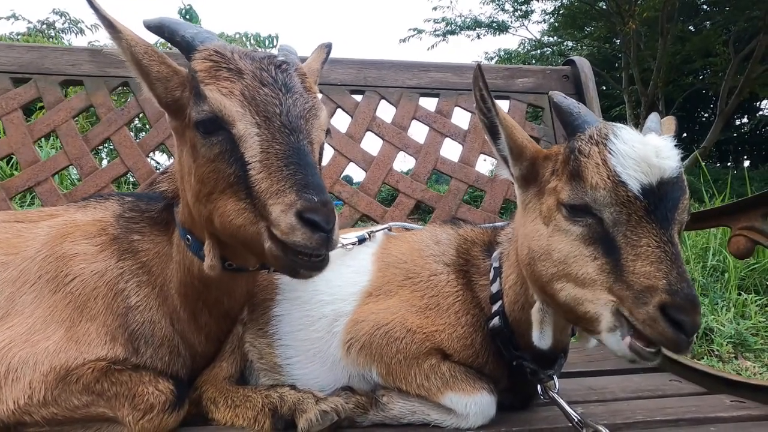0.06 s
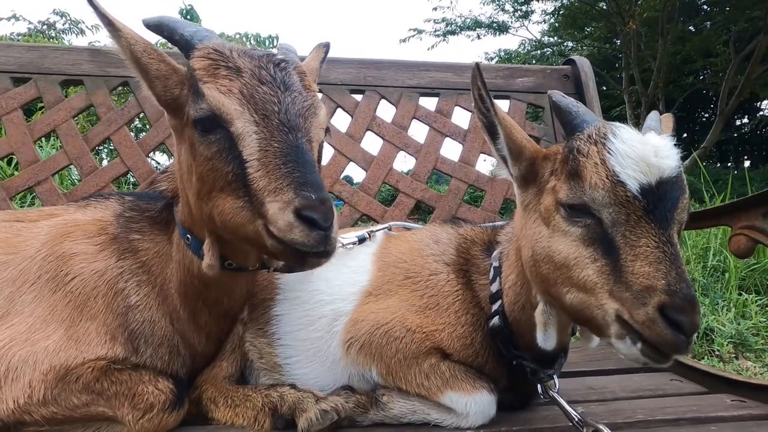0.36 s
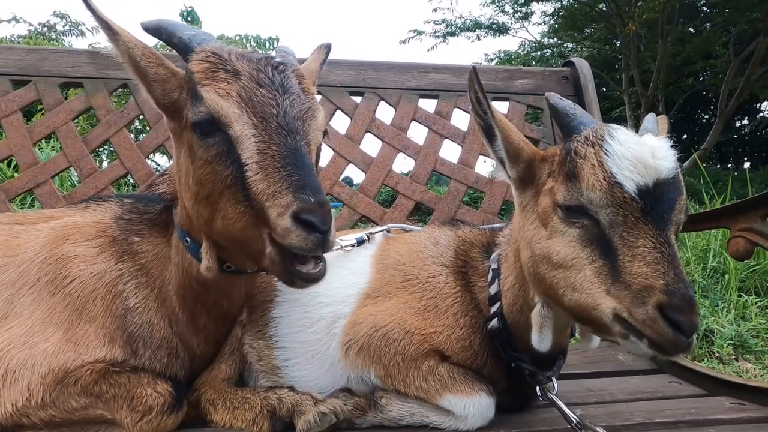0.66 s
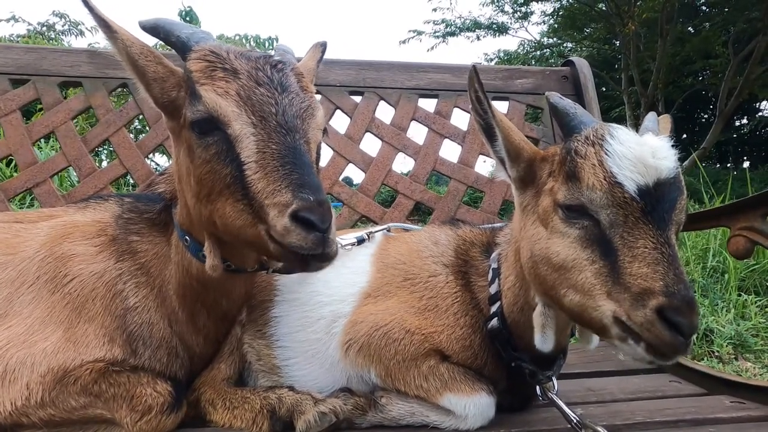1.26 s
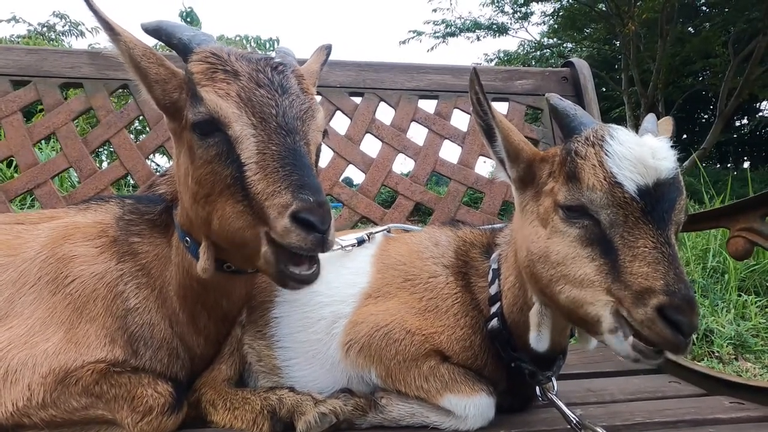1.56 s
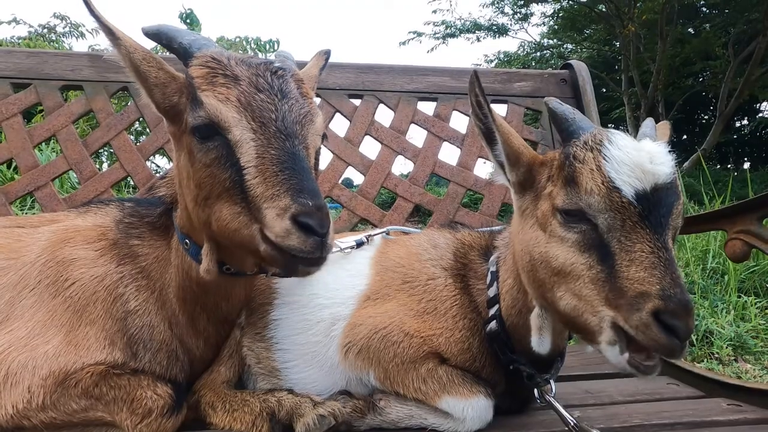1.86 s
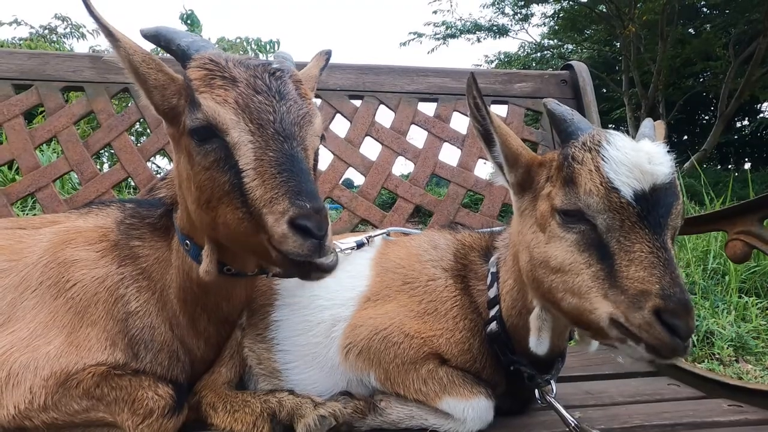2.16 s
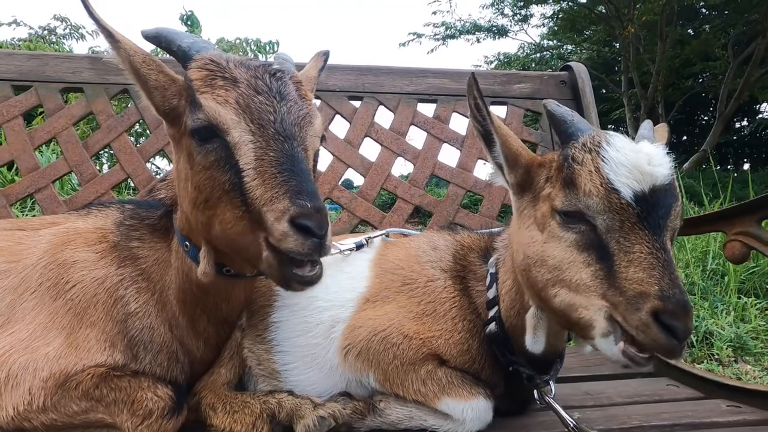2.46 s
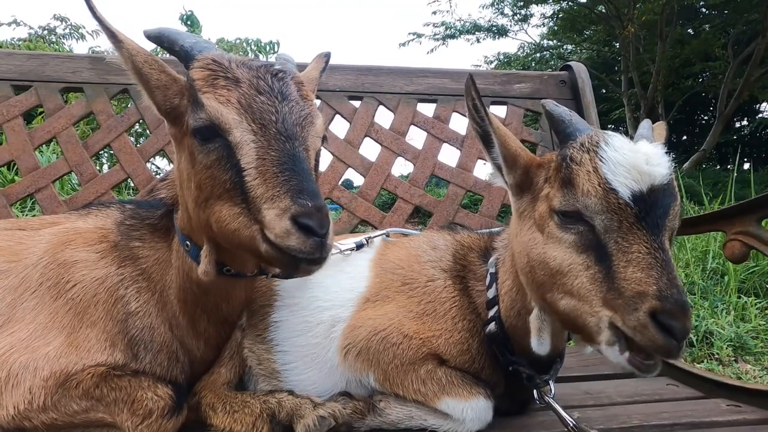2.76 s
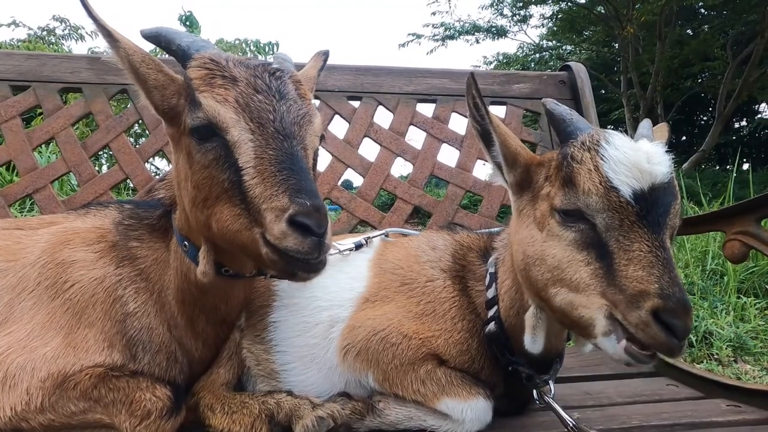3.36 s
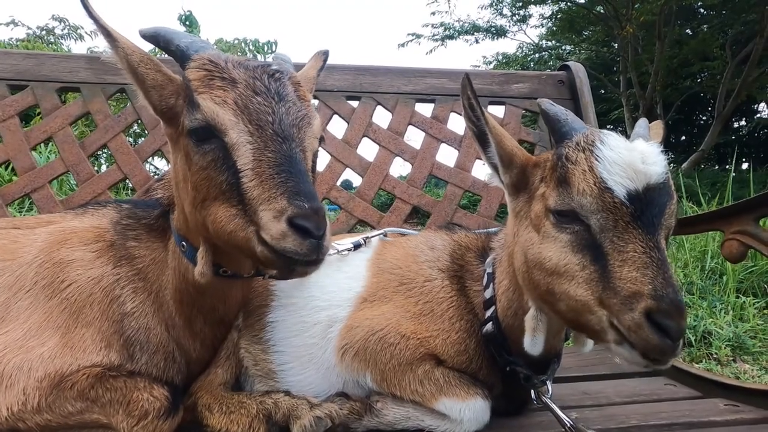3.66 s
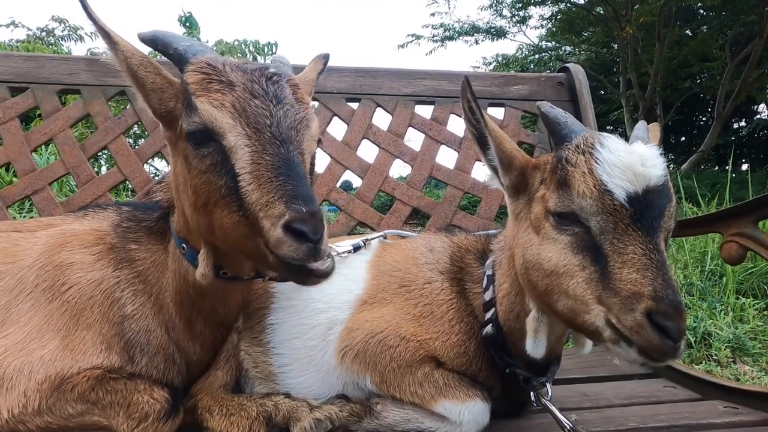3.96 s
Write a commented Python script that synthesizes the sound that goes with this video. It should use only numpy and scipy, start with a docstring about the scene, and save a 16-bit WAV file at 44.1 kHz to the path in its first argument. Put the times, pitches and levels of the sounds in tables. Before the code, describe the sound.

Two goats softly chew with wet clicks outdoors while insects hiss and tick.

```python
"""From the start, a low outdoor rumble and a light breeze lie under the hiss of rasping insects, mostly
on the left. Two goats chew cud on a garden bench, each about twice a second: fibres fracture between the
molars in a gritty grind, then wet clicks ring the resonances of the mouth. Meanwhile one insect ticks in
pairs, and before the first second is out another swells in the first of three thin trills. Near two
seconds a low hum swells once; as it fades, a far bird gives three two-note calls."""
import sys
import numpy as np
from scipy import signal
from scipy.fft import rfft, irfft, next_fast_len
from scipy.io import wavfile
from scipy.ndimage import uniform_filter1d, map_coordinates

SR = 44100
rng = np.random.default_rng(int(sys.argv[2]) if len(sys.argv) > 2 else 0)


def master(y):
    """Save y as 16-bit WAV."""
    cut = np.clip(np.atleast_2d(y).T, -1, 1)
    pcm = np.round(cut * 32767)  # scale
    wavfile.write(sys.argv[1], SR, pcm.astype(np.int16))


N = 176400


def amp(db):
    """Amplitude ratio: a factor of ten for every 20 dB."""
    return 10 ** (np.asarray(db) / 20)


def unit(x):
    """Normalisation to rms 1."""
    return x / np.sqrt(np.mean(x ** 2) + 1e-20)


def clock():
    """Uniform sampling: the time of every sample in seconds."""
    return np.arange(N) / SR


def wobble(rate):
    """Smooth random modulation: a spline through `rate` Gaussian values a second."""
    return map_coordinates(rng.standard_normal(int(N * rate / SR) + 4), [clock() * rate])


def filtered(x, response):
    """Linear filtering: the spectrum of x times a frequency response."""
    size = next_fast_len(N + SR // 4)
    return irfft(rfft(x, size) * response(np.fft.rfftfreq(size, 1 / SR)), size)[..., :N]


def coloured(x, spectrum):
    """Spectral shaping by rows of frequency_hz, gain_db; the result has rms 1."""
    frequency_hz, gain_db = np.transpose(spectrum)
    return unit(filtered(x, lambda hz: amp(np.interp(np.log(hz + 1), np.log(frequency_hz), gain_db))))


def resonate(burst, modes, focus=lambda hz: 1):
    """Modal superposition: a burst rings damped resonances; the loudest 4 ms have rms 1."""
    hz = np.fft.rfftfreq(burst.shape[-1], 1 / SR)
    response = sum((-1) ** k * amp(db) * 1j * hz * width / (centre ** 2 - hz ** 2 + 1j * hz * width)
                   for k, (centre, width, db) in enumerate(modes))
    ring = irfft(rfft(burst) * response * focus(hz), burst.shape[-1])
    return ring / np.sqrt(uniform_filter1d(ring.mean(0) ** 2, size=180).max())


def noise(side_db):
    """Partly correlated stereo white noise: more side signal widens the image."""
    mid, side = rng.standard_normal((2, N))
    return unit(np.array([mid + amp(side_db) * side, mid - amp(side_db) * side]))


def pan(db):
    """Direction by level difference: gains that put the left channel db above the right."""
    return amp(np.array([[db], [-db]]) / 2)


def band(hz, width_hz):
    """Narrow-band noise: a carrier randomly modulated in quadrature."""
    phase = 2 * np.pi * np.cumsum(hz * np.ones(N)) / SR
    return unit(wobble(width_hz) * np.sin(phase) + wobble(width_hz) * np.cos(phase))


def patchy(depth_db):
    """Spectro-temporal modulation: noise whose level drifts in small patches of time and frequency."""
    spectra = signal.stft(rng.standard_normal(N), nperseg=1024)[2]
    patches = uniform_filter1d(rng.standard_normal(spectra.shape), size=4, axis=0)
    patches = uniform_filter1d(patches, size=4, axis=1)
    return signal.istft(spectra * amp(depth_db * unit(patches)), nperseg=1024)[1][:N]


def outdoors():
    """Ambient noise in three bands: a deep unsteady rumble, a nearly steady low roar and faint far air."""
    # spectra of the three bands: frequency_hz, gain_db
    rumble_spectrum = [(12, -23.5), (28, -2), (45, -2.5), (80, 0), (105, -5), (150, -20.5), (250, -28.5),
                       (600, -75)]
    roar_spectrum = [(60, -25), (110, 1.5), (170, 2), (250, -6), (350, -12), (450, -20.5), (600, -28),
                     (900, -44), (2000, -78)]
    air_spectrum = [(300, 2), (700, -10), (1000, 1), (1300, 5), (1600, -2.5), (2200, -6.5), (3000, -12),
                    (5000, -11.5), (8000, -27), (11000, -47)]
    # envelope of the rumble: time_s, level_db
    rumble_levels = [(0.0, -45.5), (0.6, -49.5), (0.62, -58.5), (0.89, -38), (0.93, -52.5), (1.11, -39.5),
                     (1.17, -45.5), (1.68, -43), (1.74, -60), (1.77, -47), (2.72, -42), (2.74, -49.5),
                     (2.81, -39), (3.3, -49.5), (3.49, -41), (3.53, -50), (3.77, -44.5), (4.0, -51.5)]
    envelope = amp(np.interp(clock(), *np.transpose(rumble_levels)))
    rumble = envelope * coloured(noise(side_db=-22.5), rumble_spectrum) * pan(0.8)
    roar = amp(-50.5) * coloured(noise(side_db=-10), roar_spectrum) * amp(0.64 * wobble(7.05))
    air = amp(-67) * coloured(noise(side_db=-1), air_spectrum) * amp(0.94 * wobble(10))
    return rumble + roar + air


def breeze():
    """Pressure fluctuation: light air pushes on each microphone port separately, with two soft gusts."""
    # spectrum of the buffeting: frequency_hz, gain_db
    buffet_spectrum = [(10, 3), (24, 2.5), (36, 5), (60, -20), (120, -36), (400, -78)]
    # gusts: peak_s, half_width_s, level_db
    gusts = [(1.1, 0.28, -54), (2.78, 0.11, -42)]
    envelope = amp(-63.5) + sum(amp(db) * np.exp(-((clock() - s) / width) ** 2) for s, width, db in gusts)
    return envelope * coloured(noise(side_db=1.5), buffet_spectrum) * pan(2.8)


def hum():
    """Superposed partials, each roughened by narrow-band noise, swell once and decay exponentially."""
    # partials: pitch_hz, level_db, full_s, decay_s
    partials = [(85.6, -47, 2.04, 0.49), (143.5, -47, 2.2, 0.12), (197, -52, 2.176, 0.18),
                (232, -53.5, 2.2, 0.25), (259, -54.5, 2.165, 0.086), (331.4, -61, 2.2, 0.15),
                (361, -55.5, 2.195, 0.068), (505, -63, 2.25, 0.053)]
    rise_s, hold_s, roughness = 0.015, 0.068, 0.58
    t, out = clock(), np.zeros(N)
    for hz, db, full_s, decay_s in partials:
        age = t - full_s
        envelope = amp(db) * np.exp(np.minimum(age, 0) / rise_s - np.maximum(age - hold_s, 0) / decay_s)
        tone = np.sqrt(2) * np.sin(2 * np.pi * hz * t + .5 * wobble(27))
        out += envelope * (tone + roughness * band(hz, width_hz=120))
    return out


def bird():
    """Frequency modulation arches each note of a high-low call; distance blurs it into a noise band."""
    # notes: middle_s, length_s, pitch_hz, level_db
    notes = [(2.382, .1, 1360, -69), (2.506, .07, 1130, -77), (2.899, .08, 1390, -68.5),
             (2.995, 0.052, 1148, -70), (3.462, .07, 1350, -67.5), (3.561, 0.055, 1140, -71)]
    arch_hz = 52.3
    t, out = clock(), np.zeros(N)
    for middle_s, length_s, hz, db in notes:
        offset = np.clip((t - middle_s) / (length_s / 2), -4, 4)
        out += amp(db) * np.exp(-offset ** 2 / 2) * band(hz - arch_hz * offset ** 2 / 2, width_hz=130)
    return out


def insect_chorus():
    """Incoherent summation: many rasps merge to a hiss that wing strokes flutter; a few stand out."""
    # spectrum of the hiss on each side: frequency_hz, gain_db
    left_spectrum = [(2500, -41), (3400, -15), (4000, -6), (4550, -1), (5100, -4), (5600, -9.5),
                     (5950, -16), (6700, -16), (7100, -10), (7600, -8.5), (8020, -10.5), (8250, -26),
                     (9500, -30), (10800, -36), (12000, -30), (12800, -41)]
    right_spectrum = [(2800, -44), (3650, -6), (4600, -4), (5100, -4), (5700, -21.5), (6500, -23),
                      (7800, -26), (8300, -36), (10400, -53), (10800, -52), (12800, -52)]
    # contour that the hiss follows weakly and the single raspers strongly: time_s, level_db
    contour = [(0, -65), (.3, -66.5), (.6, -64), (.8, -64.5), (1.0, -64), (1.25, -66), (1.55, -67.5),
               (1.8, -67), (2.2, -64.5), (2.6, -64.5), (2.95, -64.5), (3.1, -66.5), (3.4, -66), (3.7, -64),
               (3.85, -72.5), (4, -63.5)]
    contour_db = np.interp(clock(), *np.transpose(contour))
    mean_db = contour_db.mean()
    swell_db = contour_db - mean_db
    left = coloured(patchy(depth_db=1.5), left_spectrum)
    left *= amp(mean_db + 5 + .3 * swell_db + 0.21 * wobble(20) + .8 * wobble(130))
    raspers = sum(band(hz + 60 * wobble(25), width_hz=260) * amp(1.3 * wobble(18) + 2 * wobble(110))
                  for hz in (4520, 4720, 5020))
    left += amp(mean_db + .5 + 2.8 * swell_db) * unit(raspers)
    right = coloured(patchy(depth_db=3), right_spectrum)
    right *= amp(mean_db - 5.5 + 0.22 * swell_db + 0.73 * wobble(80))
    return np.array([left, right])


def trilling_insect():
    """Amplitude modulation of a narrow band: a thin trill swells slowly, holds and breaks off."""
    # trills, ahead of the channel gains: end_s, level_db
    trills = [(1.17, -71), (2.47, -74.5), (3.81, -72.5)]
    pitch_hz, rise_s, hold_s = 6385, 0.22, 0.27
    corners_s = [-hold_s - rise_s, -hold_s, -.02, 0]
    envelope = sum(amp(db) * np.interp(clock() - end_s, corners_s, [0, 1, 1, 0]) for end_s, db in trills)
    return envelope * band(pitch_hz + 45 * wobble(90), width_hz=310) * amp([[-2], [-16]])


def ticking_insect():
    """Pairs of short falling chirps on the left; scattering in the garden adds a faint tail."""
    # pairs of ticks: first_tick_s, level_db
    pairs = [(.127, -47.5), (.267, -48), (.406, -50), (.552, -48), (1.861, -49.5), (1.998, -48.5),
             (2.134, -48), (2.272, -47.5), (2.412, -48), (2.551, -47.5), (2.693, -48), (3.911, -48)]
    gap_s, width_s, pitch_hz, fall_hz_per_s = .0175, 0.0018, 5518, 99000
    reverberation_s = 0.6
    direct, t = np.zeros(N), np.arange(-400, 400) / SR
    envelope = np.exp(-(t / width_s) ** 2 / 2)
    for first_s, db in pairs:
        for tick_s in (first_s, first_s + gap_s):
            hz = pitch_hz * (1 + .009 * rng.normal())
            chirp = np.sin(2 * np.pi * (hz * t - fall_hz_per_s * t ** 2 / 2 + rng.random()))
            tick = amp(db + rng.normal(0, 0.56)) * chirp * envelope
            direct[round(tick_s * SR) - len(t) // 2:][:len(t)] += tick
    delay_s = np.arange(SR // 4) / SR
    tail = rng.standard_normal(len(delay_s)) * amp(-60 * delay_s / reverberation_s)
    scattered = amp(-7) * signal.fftconvolve(direct, tail / np.linalg.norm(tail))[:N]
    return (direct + scattered) * amp([[0], [-26]])


def grinding(strokes, mouth, rise_s, fall_s, grit_db):
    """Fracture noise: molars crush fibres in clumps of tiny cracks that swell and stop with each stroke."""
    t = clock()
    force = sum(amp(db) * np.exp(np.minimum((t - s) / rise_s, (s - t) / fall_s)) for s, db in strokes)
    cracks = noise(side_db=-9.5) * amp(grit_db * wobble(350))
    return force * coloured(cracks, mouth)


def chewing_goats():
    """Source and filter: two goats grind in turn, and each mouth colours its own cracks."""
    # grinding strokes of the brighter and the deeper goat: peak_s, level_db
    brighter_strokes = [(.25, -61.5), (.715, -61), (1.2, -67.5), (1.71, -62.5), (2.195, -63), (2.65, -62.5),
                        (3.085, -64), (3.515, -64.5)]
    deeper_strokes = [(.41, -63), (.905, -61.5), (1.35, -68.5), (1.81, -65), (2.28, -64), (2.735, -64),
                      (3.16, -67), (3.665, -62)]
    # response of each mouth: frequency_hz, gain_db
    brighter_mouth = [(300, -24), (800, -11), (1500, -7), (1880, -8.5), (2100, 1.5), (2300, -4),
                      (2490, 3.5), (2720, -3.5), (3050, -6.5), (3450, -9), (3750, -3), (4500, -19),
                      (8000, -31), (12000, -45)]
    deeper_mouth = [(300, -15), (730, -1), (890, -3.5), (1020, -6), (1350, -7), (1600, -3.5), (1950, -2.5),
                    (2250, -8.5), (2500, -8), (2900, -7), (4500, -25), (8000, -34), (12000, -54)]
    brighter_goat = grinding(brighter_strokes, brighter_mouth, rise_s=0.043, fall_s=0.023, grit_db=4)
    deeper_goat = grinding(deeper_strokes, deeper_mouth, rise_s=.04, fall_s=0.066, grit_db=3)
    return brighter_goat * pan(-1) + deeper_goat * pan(1)  # both near the centre


def lip_smacks():
    """Film rupture: thin films of saliva snap on the lips in brief, bright impulses."""
    # snaps: peak_s, level_db
    snaps = [(.203, -72), (2.138, -70), (2.305, -71), (3.71, -72.5)]
    # spectrum of a snap: frequency_hz, gain_db
    snap_spectrum = [(4000, -20), (8000, -2), (10000, -5), (11800, -5), (14000, -10)]
    t, width_s = clock(), 0.0014
    envelope = sum(amp(db) * np.exp(-abs(t - s) / width_s) for s, db in snaps)
    return envelope * coloured(noise(side_db=-5), snap_spectrum) * pan(8.2)


def mouth_clicks():
    """Impulse excitation: wet bursts of cracks ring the teeth and, around one pitch each, the cavity."""
    # clicks: time_s, relative_cavity_db, relative_teeth_db, pitch_hz, left_over_right_db
    clicks = [(.255, -62, -59.5, 1980, 2), (.265, -65, -62, 1880, 0), (.353, -69, -72, 1260, 2),
              (.412, -68, -71, 1570, 2), (.443, -64, -66, 1490, 1), (.558, -57.5, -65, 1860, -1),
              (.567, -58.5, -73, 1500, 5), (.717, -62, -60, 1500, 2), (.735, -68, -62, 1890, 0),
              (.845, -55.5, -91, 1170, 3), (.909, -55, -68, 1610, -1), (.934, -59, -60, 1410, 5),
              (.943, -48, -60, 1710, 3), (1.211, -65, -63.5, 1680, 1), (1.277, -63.5, -88, 1130, 1),
              (1.339, -64, -64.5, 1610, 7), (1.365, -64, -68, 1940, 0), (1.414, -69, -63.5, 1470, 7),
              (1.713, -61, -59.5, 1720, 1), (1.789, -63, -83, 1420, 0), (2.212, -72, -63, 1850, 3),
              (2.253, -62, -81, 1370, 0), (2.303, -56, -62, 1540, 2), (2.308, -55.5, -61, 1520, 4),
              (2.337, -51.5, -60, 1400, 1), (2.635, -64, -64, 1620, 1), (2.776, -65, -76, 1690, 1),
              (3.073, -66, -62, 1950, -2), (3.099, -69, -64, 1880, 2), (3.143, -65.5, -68, 1590, 5),
              (3.213, -63.5, -63.5, 1670, 7), (3.499, -62, -66, 1380, 1), (3.526, -68, -63.5, 1330, 1),
              (3.643, -63, -69, 1490, 4), (3.677, -55, -59.5, 1320, 6), (3.71, -48.5, -56, 1550, 2.5)]
    # low resonances of the mouth cavity, high ones of the teeth: centre_hz, bandwidth_hz, gain_db
    cavity_modes = [(623, 180, -10), (910, 86, -5.5), (1260, 280, -2), (1870, 240, -2)]
    teeth_modes = [(2420, 240, 6.5), (2990, 320, 4.5), (3390, 380, 2.5), (4840, 2300, -6),
                   (7600, 3500, -11.5), (9670, 2700, -23)]
    rise_s, fall_s, cavity_gain_db, teeth_gain_db = 0.0016, 0.0025, 1, 0.5
    focus_octaves = 0.53  # spread of the cavity's ring around the click's pitch
    out = np.zeros((2, N))
    t = np.arange(-SR // 50, SR // 25) / SR
    envelope = np.exp(np.minimum(t / rise_s, -t / fall_s))
    for time_s, cavity_db, teeth_db, pitch_hz, pan_db in clicks:
        mid, side, crack_size = rng.standard_normal((3, len(t)))
        burst = envelope * amp(2.9 * crack_size) * (mid + amp(-9) * np.array([side, -side]))
        focus = lambda hz: np.exp(-(np.log2((hz + 1) / pitch_hz) / focus_octaves) ** 2 / 2) + amp(-15)
        cavity = amp(cavity_db + cavity_gain_db) * resonate(burst, cavity_modes, focus)
        teeth = amp(teeth_db + teeth_gain_db) * resonate(burst, teeth_modes)
        start = round((time_s + t[0] - .001) * SR)
        out[:, start:][:, :len(t)] += (cavity + teeth) * pan(pan_db)
    return out


def scene():
    """Superposition: the goats in front add to the garden around them."""
    goats = chewing_goats() + mouth_clicks() + lip_smacks()
    insects = ticking_insect() + trilling_insect() + insect_chorus()
    return goats + insects + bird() + hum() + outdoors() + breeze()


def record(dry):
    """Band limiting: an ideal low-pass filter removes the highest treble."""
    cutoff_hz = 12800
    return filtered(dry, lambda hz: hz < cutoff_hz)


dry = scene()
out = record(dry)
master(out)
```